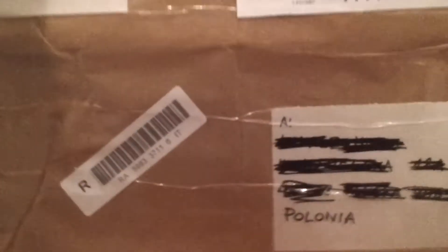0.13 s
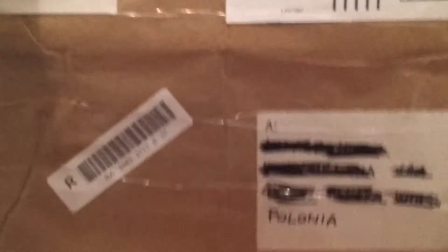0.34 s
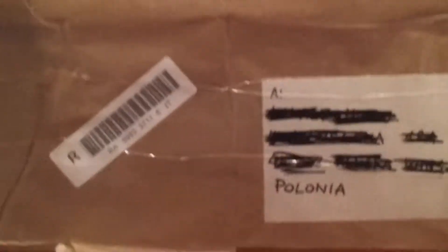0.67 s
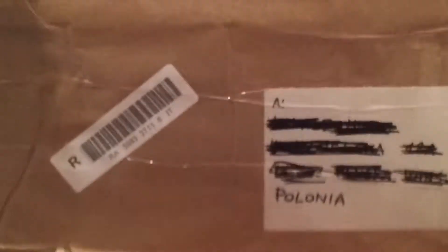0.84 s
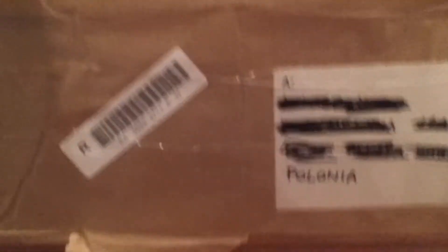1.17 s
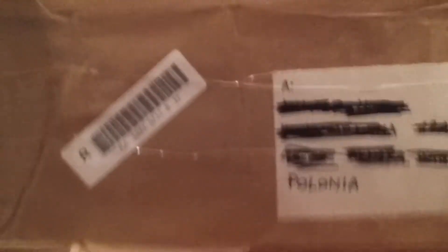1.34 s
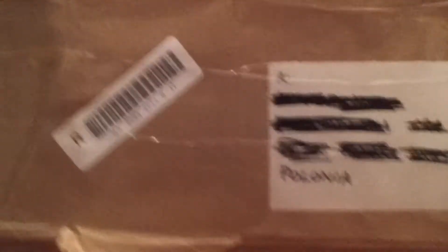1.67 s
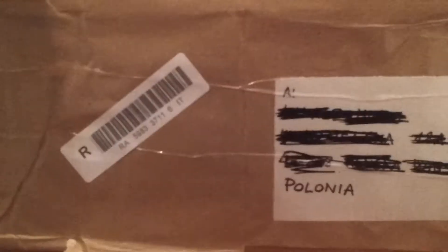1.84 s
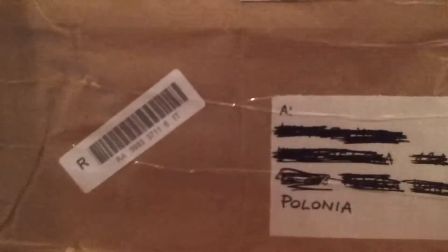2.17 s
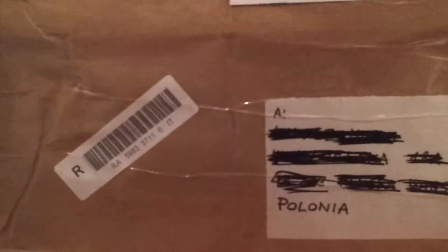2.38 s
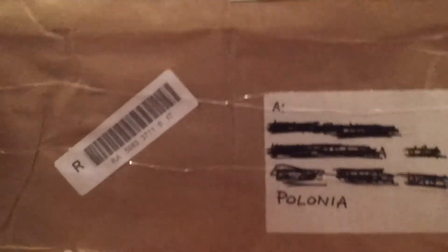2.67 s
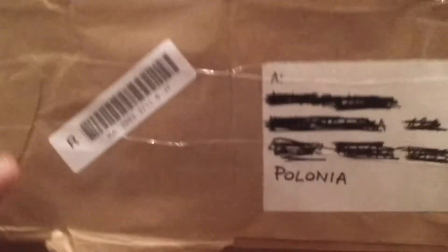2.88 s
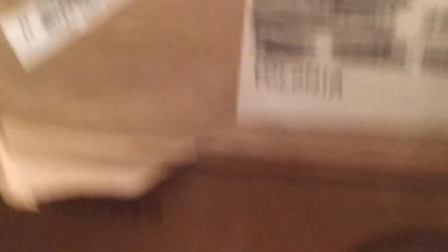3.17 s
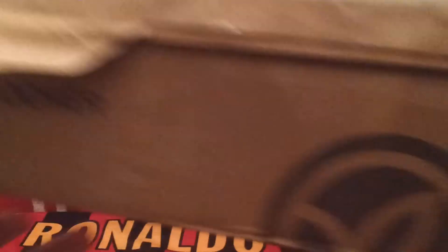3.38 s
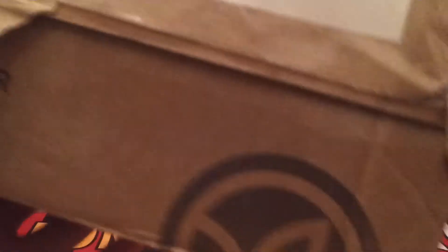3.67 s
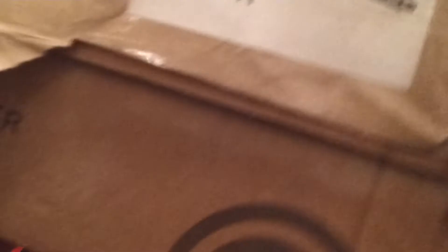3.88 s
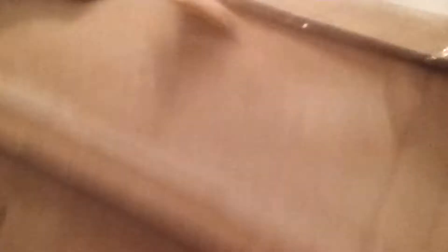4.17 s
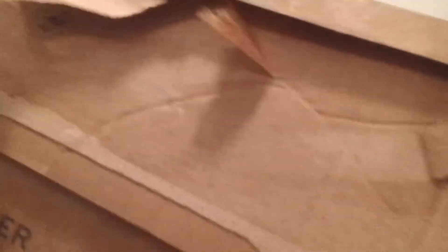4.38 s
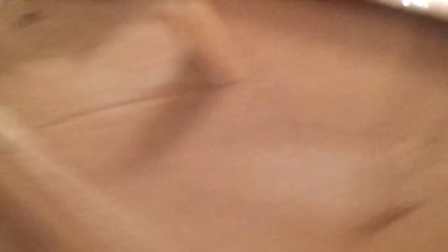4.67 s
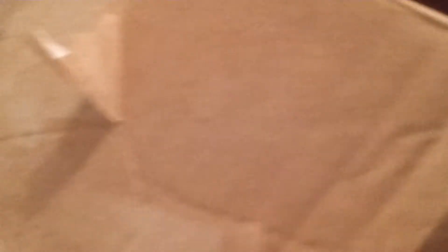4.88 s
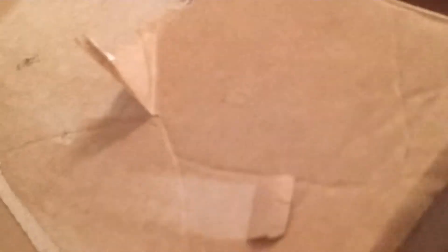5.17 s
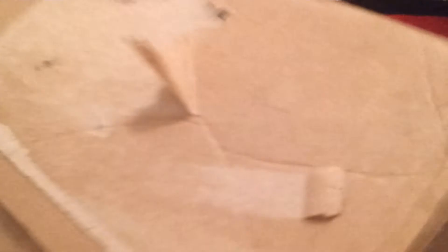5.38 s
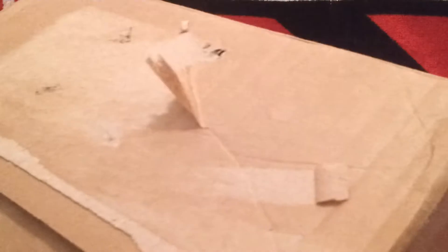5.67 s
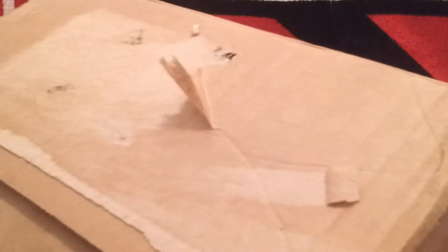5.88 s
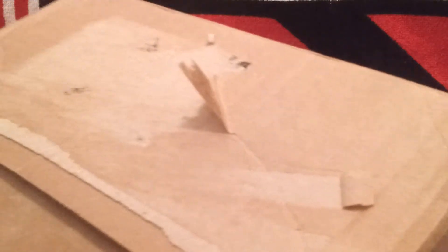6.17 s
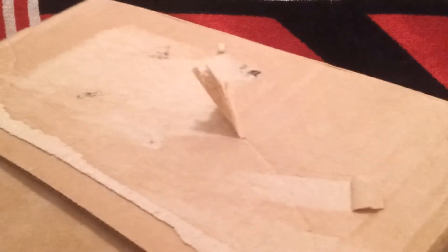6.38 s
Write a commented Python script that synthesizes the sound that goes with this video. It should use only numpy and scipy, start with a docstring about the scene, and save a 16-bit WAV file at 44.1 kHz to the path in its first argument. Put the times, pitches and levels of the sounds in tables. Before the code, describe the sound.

Dense bursts of ripping fibres and peeling glue, very close and dry, with sharp cracks and boxy thumps underneath. The pulls come several per second, pause briefly after three seconds, then return brighter and more papery in a longer tear. From about five seconds only weak rustles, ticks and faint high squeaks remain over microphone hiss, until a couple of quick scrapes close it. The loudest snaps distort in the small stereo microphone.

```python
"""Right by a cardboard box, at a small stereo camera: packing tape and brown paper are torn and scraped off.
Fibres and glue let go as dense noise bursts and single snaps, filtered by resonances of box, air and sheet.
Brief rings of narrow-band noise are low box thumps and high squeaks; hiss and low bumps are shaped noise.
The strongest peaks overload the input."""
import sys
import numpy as np
from scipy import signal
from scipy.fft import rfft, irfft
from scipy.io import wavfile
from scipy.ndimage import uniform_filter1d

SR = 44100
rng = np.random.default_rng(int(sys.argv[2]) if len(sys.argv) > 2 else 0)


def store_wav(level_fs):
    """Save 16-bit WAV to argv[1]."""
    pcm = np.round(np.clip(np.atleast_2d(level_fs), -1, 1) * 32767)
    wavfile.write(sys.argv[1], SR, pcm.T.astype(np.int16))


def field_ratio(decibels):
    """Amplitude ratio for a level in dB (20 dB per decade); scalars and array-likes work."""
    return 10 ** (np.asarray(decibels, dtype=float) / 20)


N = 287840

# resonances of each part: (centre [Hz], width before broadening [Hz], relative level [dB])
BOX_AIR_MODES = [(150, 240, -18), (311, 31.8, 2), (353, 38.5, 1.5), (468, 86, -4.5)]
BOX_WALL_MODES = [(661, 134, -6.5), (849, 128, -1), (1050, 207, -3), (1240, 175, -4)]
SHEET_MODES = [(1737, 465, 0), (2480, 637, 0.0047)]
FIBRE_MODES = [(3280, 1156, -3.5), (4500, 1227, 2), (5190, 1346, -0.5), (6790, 2250, -13.5)]
FIZZ_MODES = [(7260, 1350, -13), (9600, 8000, -29.5), (12600, 3100, -36)]
# snaps: (time [s], crack peak [dB], crack ring [Hz], drive of the box knock [dB], left over right [dB])
SNAPS = [(0.4355, -5.5, 1800, -9, -3), (0.539, -12, 1480, 0, -3), (0.6204, -10, 1890, 0, 0),
         (0.7333, -7, 1840, -21, -5), (0.845, -15, 3810, -19, -7), (0.859, -13.5, 2000, -6, -6),
         (0.8753, -4, 4800, -13, -2), (1.009, -13, 4840, -4, -13), (1.089, 1.5, 2100, -13, -4),
         (1.095, -7, 3400, -24, 11), (1.16, -1.5, 1780, -10, 0), (1.283, -7, 2240, -11.5, 9),
         (1.419, -8, 2110, -13, -2), (1.435, -10.5, 2830, -11, -2), (1.4535, -9.5, 2200, -10, -3),
         (1.5076, -5.5, 2050, -7.5, 0), (1.768, -12.5, 2180, -4, 3), (1.9597, -18, 4650, 4, 0),
         (1.9874, 3.5, 2130, -40, -1), (2.0732, -2, 1740, -15.5, -3), (2.2631, -5, 2930, -12, 7.5),
         (2.273, -5.5, 1820, -12.5, 4), (2.4092, -3, 6000, -37, -3), (2.4268, 2, 3500, -15, -1),
         (2.528, -1, 1700, -9.5, -2), (2.578, -10, 2100, -11, 3), (2.615, 7.5, 2080, -20.5, -4.5),
         (2.781, -4, 5400, -4.5, 2), (2.7938, -4.5, 3940, -15, -4), (2.832, -3.5, 2040, -13, -3),
         (2.843, -6, 3550, -8, -5), (2.979, -8.5, 2120, -8, 1), (3.0105, -3, 1460, -21, 2),
         (3.1316, -4.5, 1970, -8, 1), (3.312, -2.5, 3760, -35, -2), (3.575, -19.5, 2070, -7, -13.5),
         (3.5919, -9, 3860, -25, 5), (3.646, -10, 4520, -23, -4.0), (3.8794, -1, 3570, -15, 0),
         (3.9789, -18, 2620, -14, 3), (4.053, 3, 4230, -34, -14), (4.4812, -3.5, 4900, -16, 1),
         (4.5084, -8, 3000, -23, -9), (4.5286, -12, 4500, -30, 5), (4.682, -5.5, 3820, -9, -7),
         (4.8002, -10, 4500, -7, -8), (5.0664, -2.5, 4040, -34, 3), (5.5478, -20.5, 1500, -3, -2),
         (5.6055, -11, 2400, -20, 9), (5.7129, -16, 7250, -10, -2), (5.812, -7.5, 8650, -35, 7),
         (6.0018, -16, 6630, -33, 15), (6.0472, -10, 4100, -22, -1), (6.216, -18, 7540, -24, -0.5),
         (6.3104, -3.5, 3230, -17, 8), (6.3963, -6, 4200, -23, 3), (6.435, -2, 5170, -28, 4)]
CRACK_T60_S = 0.012
AFTER_DB, AFTER_T60_S = -16, 0.24  # rustle after every snap, re its crack
# brief rings, low thumps from the pressed box, high squeaks from taut slipping strips:
# (time [s], length [s], centre [Hz], width per filter pass [Hz], level before the envelope [dB])
RINGS = [(0.259, 0.033, 297, 60, -33), (0.905, 0.072, 320, 50, -22), (1.766, 0.04, 322, 60, -27),
         (1.961, 0.064, 313, 60, -27.5), (4.06, 0.045, 297, 70, -20.5), (1, 0.053, 150, 50, -20),
         (1.437, 0.032, 150, 50, -26.5), (2.07, 0.089, 1050, 150, -24.5), (2.103, 0.14, 3900, 300, -33),
         (2.271, 0.14, 1830, 200, -26), (2.275, .06, 2970, 200, -38), (3.355, 0.028, 4500, 250, -19),
         (3.6, 0.057, 1185, 150, -23), (3.858, 0.063, 293, 59, -22), (5.816, 0.021, 8200, 90, -31),
         (5.944, 0.007, 6550, 150, -24.5), (5.957, 0.014, 6590, 90, -24), (5.964, 0.072, 8170, 60, -35),
         (5.99, 0.026, 6620, 90, -30), (6.317, .05, 900, 150, -18.5)]
# hiss spectrum: (frequency [Hz], relative density [dB per Hz])
HISS_SPECTRUM = [(40, 14.5), (130, 7), (250, 9.5), (800, 10), (1500, 6.5), (4200, 7.5), (13000, -4.5),
                 (15000, 4)]
HISS_RMS_DB = -33
# likeness of the two ports: (frequency [Hz], left-right correlation [-1..1, clipped])
PORT_LIKENESS = [(60, -0.075), (120, -0.27), (240, 0.82), (480, 0.83), (750, 0.8), (950, 0.7), (1890, 0.12),
                 (3760, -0.22), (7500, 0.3), (15000, -1.4)]
# port sensitivity: (frequency [Hz], left over right [dB])
PORT_BALANCE = [(60, 13), (180, 2.8), (550, 1), (1640, -0.5), (4960, 1), (15000, -9.5)]
LEFT_LATE_SAMPLES = 9.36  # the parcel lies nearer the right port
# tugs of the hand: (start [s], hold [s], force [dB], tear over box [dB], tape in the tear [dB])
TUGS = [(-0.05, 0.045, -22.5, 8, -15), (0.015, 0.097, -23.5, 7.5, -11), (0.212, 0.066, -20, 4.5, -9.5),
        (0.322, 0.096, -23.5, 11.5, -9.5), (0.393, .1, -25.5, 5, -7), (0.495, 0.085, -21.5, 4, -7.5),
        (0.622, 0.077, -26.5, 0, -16), (0.732, 0.024, -25.5, 1, -12), (0.845, 0.042, -23, 7, -11.5),
        (0.892, 0.033, -22.5, -1, -3.5), (0.996, 0.04, -20.5, 5.5, -7.5), (1.1, .02, -22.5, -2, -24),
        (1.158, .015, -22, -4, -18), (1.19, 0.083, -30, -2, -18), (1.285, 0.034, -24.5, 0.5, -19),
        (1.383, .015, -27.5, -9, -9), (1.408, .06, -21, -5.5, -14), (1.491, 0.034, -20, -7, -24),
        (1.597, 0.042, -27, -0.5, -5), (1.758, .03, -24, -5.5, -10), (1.941, 0.073, -24.5, 3, -4),
        (2.065, 0.05, -26.5, 5.5, -14), (2.142, 0.11, -39, 12, -11), (2.273, 0.13, -37, 9.5, -12),
        (2.417, 0.07, -23.5, 0.5, -8), (2.48, 0.11, -21, 1.5, -26), (2.612, 0.055, -23.5, 4, -17.5),
        (2.688, .05, -30.5, 5.5, -10), (2.775, 0.11, -22, 5, -23), (2.949, .035, -26, -3, -10),
        (3.015, 0.037, -23.5, -5, -18), (3.136, 0.056, -27.5, -2.5, -6), (3.309, 0.021, -28, 8.5, -27),
        (3.339, 0.032, -34.5, 9.5, -1), (3.53, 0.024, -45, 6, 2), (3.588, .12, -26, 1, -11),
        (3.734, 0.078, -30.5, 1, -1), (3.837, .04, -25, -3, -3), (3.878, 0.028, -18, -1, -17),
        (3.917, 0.2, -23, -0.5, -13), (4.05, 0.13, -16, 6.5, -5.5), (4.188, 0.086, -25, 11, -17),
        (4.265, 0.15, -22.5, 2.5, -24), (4.361, .18, -25, 7, -22), (4.553, 0.049, -29, 4.5, -7),
        (4.603, 0.081, -27, 6.5, -14), (4.679, 0.06, -26.5, 10.5, -5), (4.73, 0.12, -24, 5.5, -1.5),
        (4.857, 0.12, -31, 6.5, -3.5), (4.936, 0.11, -29, 8.5, -2.5), (5.061, 0.02, -27, 10, -5.5),
        (5.1, 0.12, -35.5, 2, 0), (5.19, .3, -43.5, 3.5, -0.5), (5.528, 0.026, -33.5, -12, -15),
        (5.602, .01, -34, 5, -7), (5.675, 0.086, -40.5, 4.5, 3), (5.8, .05, -55, 7, 12),
        (5.938, 0.076, -47, 9, 5), (6.064, 0.054, -40, 7.5, -2), (6.144, 0.096, -41.5, -5, 7),
        (6.277, 0.044, -38, 3.5, -6), (6.303, 0.086, -21.5, 2.5, -43), (6.431, 0.037, -23, 4, -9)]
# answer of each part to a tug:
# (level over force [dB], share of the tear [factor], share of the tape [factor], fade after the hold [dB/s])
TUG_ANSWER = {"air": (-6.5, -0.08, 0.25, 111), "wall": (0, 0, 0, 104), "sheet": (-0.5, 0.3442, 0.06, 122),
              "fibres": (0.5, 1, 0, 141), "fizz": (0.5, 1, 1, 189)}
FREED_WITHIN_S, FREED_RISE_S = 0.008, 0.0061  # a snap this near the start frees the tug: it bites this fast
SWELL_SHARE = 0.45  # any other tug swells over this share of its hold
PATCH_DB = 1.62  # rms colour drift of the tear as the creases move
# rumble spectrum: (frequency [Hz], relative density [dB per Hz])
RUMBLE_SPECTRUM = [(20, -18), (45, 2), (80, -14.5), (120, -34), (200, -70)]
RUMBLE_RMS_DB = -25  # before the bass cut


def evened(x):
    """Scales so that the mean of both channels has rms 1."""
    return x / np.sqrt(np.mean(x.mean(0) ** 2) + 1e-20)


def read(points, hz):
    """Spectrum table interpolated over log frequency."""
    f, value = np.transpose(points)
    return np.interp(np.log(hz + 1), np.log(f + 1), value)


def through(x, response):
    """Filters by a frequency response."""
    return irfft(rfft(x) * response, x.shape[-1])


def ring(hz, width_hz, size):
    """Response of one resonance, a conjugate pole pair of gain about 1 at its centre."""
    pole = np.exp((2j * np.pi * hz - np.pi * width_hz) / SR)
    back = np.exp(-2j * np.pi * np.fft.rfftfreq(size))
    return (1 - abs(pole)) * (1 / (1 - pole * back) + 1 / (1 - pole.conjugate() * back))


def body(modes, size):
    """Resonances of alternating sign, each passed twice so that the valleys stay dark."""
    response = 0
    for k, (hz, width_hz, db) in enumerate(modes):
        response = response + (-1) ** k * field_ratio(db) * ring(hz, 1.74 * width_hz, size) ** 2
    return response


def pair_noise():
    """Noise at two ports whose likeness varies with frequency; the left one lags."""
    a, b = rfft(rng.standard_normal((2, N)))
    hz = np.fft.rfftfreq(N, 1 / SR)
    same = np.clip(read(PORT_LIKENESS, hz), -1, 1)
    late = np.exp(-2j * np.pi * hz * LEFT_LATE_SAMPLES / SR)
    right = same * a + np.sqrt(1 - same ** 2) * b
    return irfft(np.array([a * late, right]), N)


def dying(power, t60_s):
    """Each spike of power dies away by 60 dB in t60_s."""
    return signal.lfilter([1], [1, -np.exp(-2 * np.log(1000) / (t60_s * SR))], power)


def grains(per_s, spread_db, t60_s, clump_db):
    """Random noise bursts whose sizes scatter and vary together in clumps."""
    clumps = uniform_filter1d(rng.standard_normal(N), size=700)
    scatter_db = spread_db * np.minimum(rng.exponential(1, N), 5)
    size_db = scatter_db + clump_db * clumps / clumps.std()
    struck = rng.random(N) < per_s / SR
    power = dying(field_ratio(2 * size_db) * struck, t60_s)
    return np.sqrt(power / power.mean()) * pair_noise()


def pull_levels():
    """Levels of the five vibrating parts: every tug bites, holds and fades, and the powers add."""
    start, hold, force_db, tear_db, tape_db = np.transpose(TUGS)[:, :, None]
    t = np.arange(0, N, 32) / SR
    freed = abs(start - np.transpose(SNAPS)[0]).min(axis=1, keepdims=True) < FREED_WITHIN_S
    rise_s = np.where(freed, FREED_RISE_S, SWELL_SHARE * hold)
    bite = np.clip((t - start) / rise_s, 0, 1) ** 2  # power
    after_s = np.maximum(t - start - hold, 0)
    levels = []
    for db, tear, tape, fade in TUG_ANSWER.values():
        level_db = force_db + db + tear * tear_db + tape * tape_db - fade * after_s
        power = (bite * field_ratio(2 * level_db)).sum(0)
        levels.append(np.interp(np.arange(N) / SR, t, np.sqrt(power)))
    return levels


def patchy(x):
    """Random patches of a few hundred Hz and some tens of ms come forward or recede."""
    z = signal.stft(x, nperseg=512)[2]
    patches = uniform_filter1d(rng.standard_normal(z.shape[1:]), size=4, axis=0)
    patches = uniform_filter1d(patches, size=10, axis=1)
    return signal.istft(z * field_ratio(PATCH_DB * patches / patches.std()), nperseg=512)[1][:, :N]


def tearing():
    """Coarse grains shake box and sheet, finer ones drive sheet and fibres, glue grains the fizz."""
    air, wall, sheet, fibres, fizz = pull_levels()
    coarse = grains(per_s=820, spread_db=0.5, t60_s=0.065, clump_db=0.5)
    fine = grains(per_s=1600, spread_db=4.0, t60_s=0.27, clump_db=-1.0)
    # single stiff fibres crackle
    fine = fine + 0.45 * grains(per_s=260, spread_db=2.6, t60_s=0.008, clump_db=2.0)
    # threads of glue part on their own
    glue = grains(per_s=680, spread_db=-0.5, t60_s=0.15, clump_db=1.6)
    box = air * evened(through(coarse, body(BOX_AIR_MODES, N)))
    box = box + wall * evened(through(coarse, body(BOX_WALL_MODES, N)))
    paper = sheet * evened(through(coarse + fine, body(SHEET_MODES, N)))
    paper = paper + fibres * evened(through(fine, body(FIBRE_MODES, N)))
    film = fizz * evened(through(glue, body(FIZZ_MODES, N)))
    return patchy(box + paper + film)


def room_tone():
    """Microphone hiss and faint room air: steady noise with a shaped spectrum."""
    spectrum = field_ratio(read(HISS_SPECTRUM, np.fft.rfftfreq(N, 1 / SR)))
    return field_ratio(HISS_RMS_DB) * evened(through(pair_noise(), spectrum))


def rumble():
    """Low lumpy bumps under the tearing: sparse grains, low-passed."""
    lumps = grains(per_s=4.3, spread_db=4.5, t60_s=0.14, clump_db=-3.0)
    spectrum = field_ratio(read(RUMBLE_SPECTRUM, np.fft.rfftfreq(N, 1 / SR)))
    return field_ratio(RUMBLE_RMS_DB) * evened(through(lumps, spectrum))


def thumps_and_squeaks():
    """Brief rings of narrow-band noise, low box thumps and high squeaks, that start quickly and fade."""
    out = np.zeros((2, N))
    for s, length_s, hz, width_hz, db in RINGS:
        noise = rng.standard_normal((3, 8192))
        at = slice(round(s * SR), round((s + length_s) * SR))
        size = at.stop - at.start
        ports = noise[:2] + 0.85 * noise[2]  # partly shared
        tone = evened(through(ports, ring(hz, width_hz, 8192) ** 2))[:, :size]
        envelope = signal.windows.tukey(size, .25) * field_ratio(np.linspace(3.0, -5.0, size))
        out[:, at] += field_ratio(db) * tone * envelope
    return out


def snaps():
    """A wide crack of a few ms coloured by the patch that lets go, a knock on the box, a rustling aftersound."""
    size = 8192
    out, noise, t = np.zeros((2, N + size)), np.tile(pair_noise(), 2), np.arange(size) / SR
    paper = 0.63 * body(SHEET_MODES, size) + 0.66 * body(FIBRE_MODES, size)
    film = 1.4 * body(FIZZ_MODES, size)
    box = field_ratio(18) * body(BOX_WALL_MODES, size) + field_ratio(13) * body(BOX_AIR_MODES, size)
    crack_shape = field_ratio(-60 * np.maximum(t - .0015, 0) / CRACK_T60_S)
    shape = (crack_shape + field_ratio(AFTER_DB - 60 * t / AFTER_T60_S)) * np.minimum(t / 0.00073, 1)
    for s, db, hz, knock_db, pan_db in SNAPS:
        at = slice(round(s * SR), round(s * SR) + size)
        burst = noise[:, at] * shape
        sheet_share = 1 / (1 + (hz / 5800) ** 6)  # high ticks come from the thin film alone
        patch = 1.82 * ring(hz, 0.12 * hz, size) * np.sqrt(3000 / hz)
        crack = through(burst, sheet_share * paper + film * (hz / 6000) + patch)
        peak = abs(crack.mean(0)).max()
        knock = field_ratio(knock_db) * through(burst, box)
        out[:, at] += (crack / peak + knock) * field_ratio([[db + pan_db / 2], [db - pan_db / 2]])
    return out[:, :N]


def scene():
    """Everything at the microphone ports."""
    return tearing() + snaps() + thumps_and_squeaks() + room_tone() + rumble()


def top_cut(x):
    """Nothing passes above the cut-off."""
    return signal.sosfilt(signal.butter(12, 15550, fs=SR, output="sos"), x)


def record(dry):
    """Unequal ports, steep treble edge, bass cut, hard overload."""
    hz = np.fft.rfftfreq(N, 1 / SR)
    tilt_db = read(PORT_BALANCE, hz) / 2
    treble_edge = 1 / np.sqrt(1 + (hz / 14600) ** 120)
    ports = through(dry, field_ratio([tilt_db, -tilt_db]) * treble_edge)
    cut = signal.sosfilt(signal.butter(4, 185, "high", fs=SR, output="sos"), ports)
    return top_cut(np.clip(cut, -1, 1))


dry = scene()
out = record(dry)
store_wav(out)
```